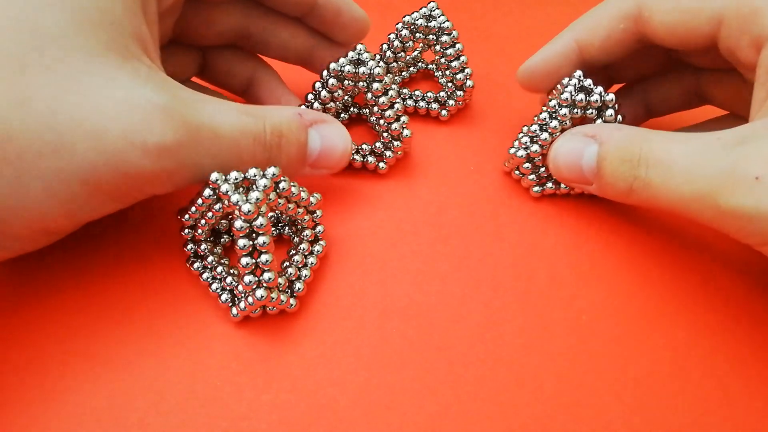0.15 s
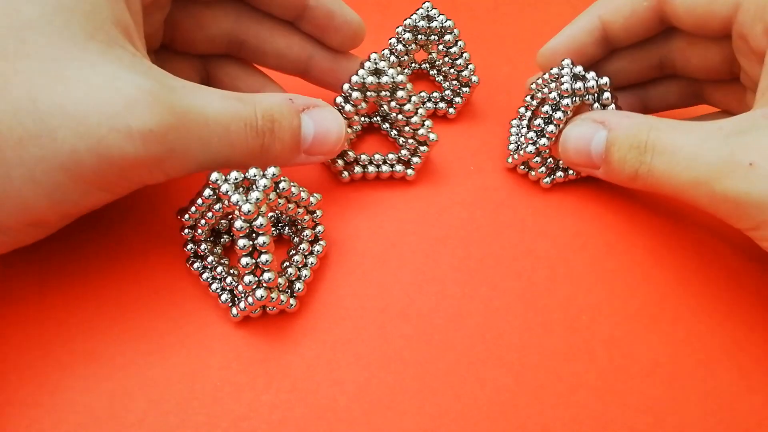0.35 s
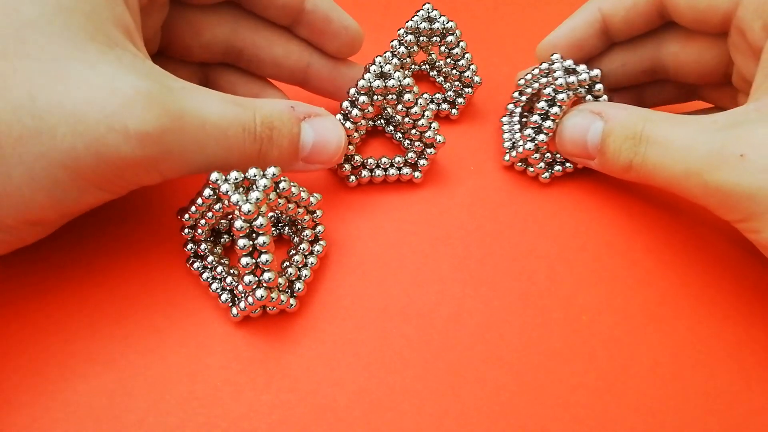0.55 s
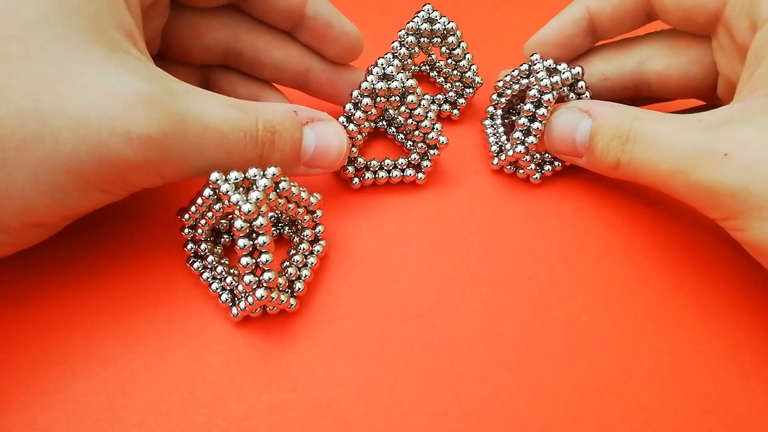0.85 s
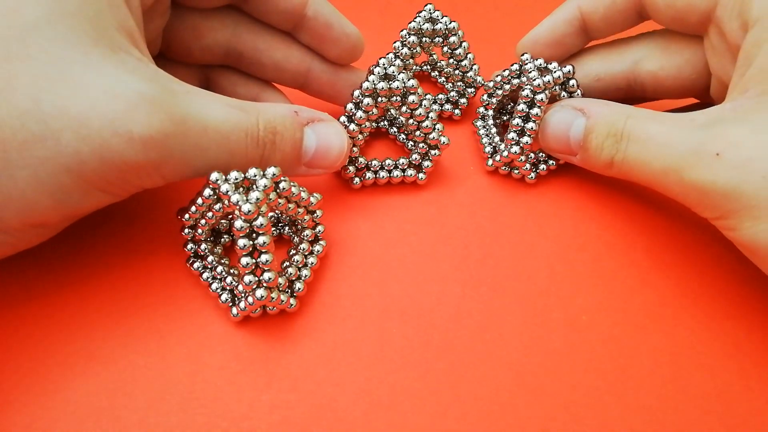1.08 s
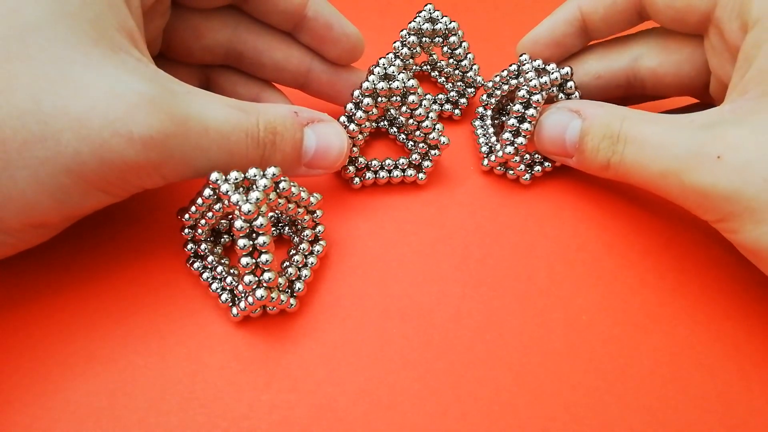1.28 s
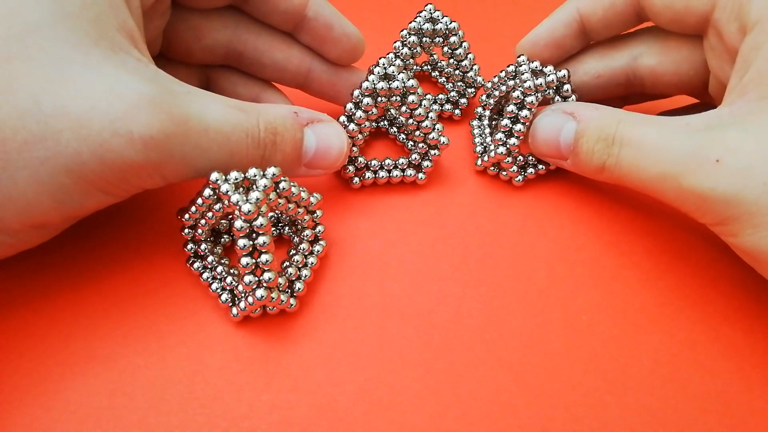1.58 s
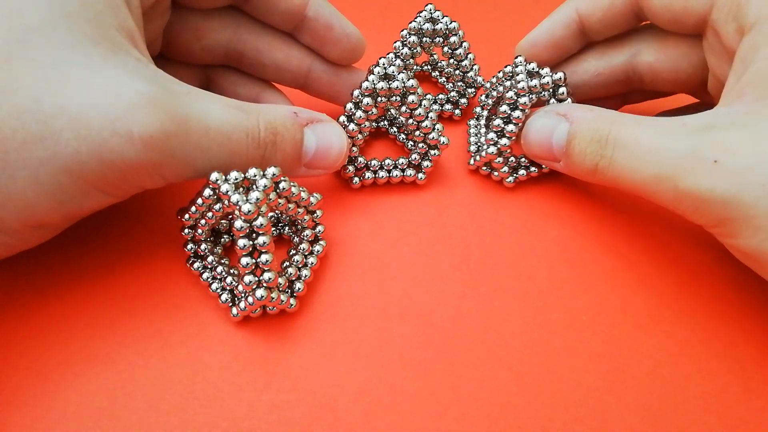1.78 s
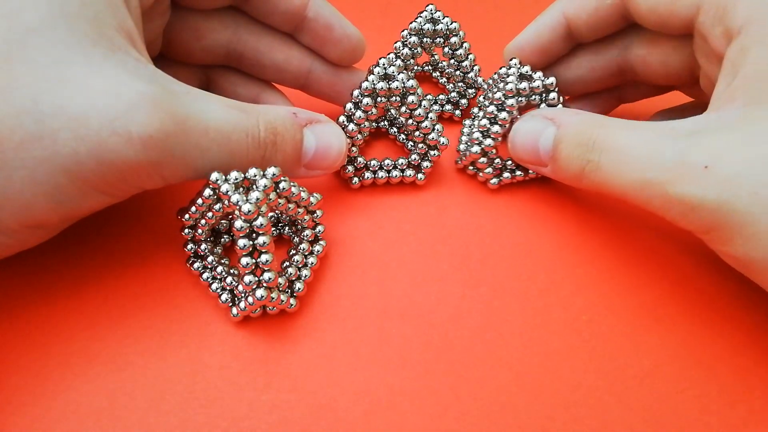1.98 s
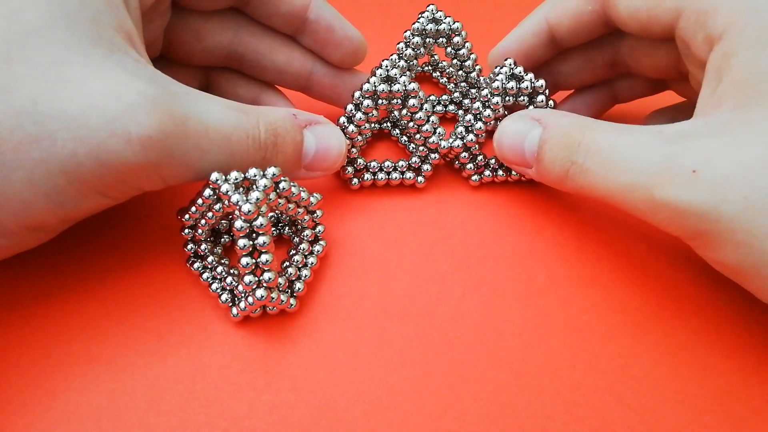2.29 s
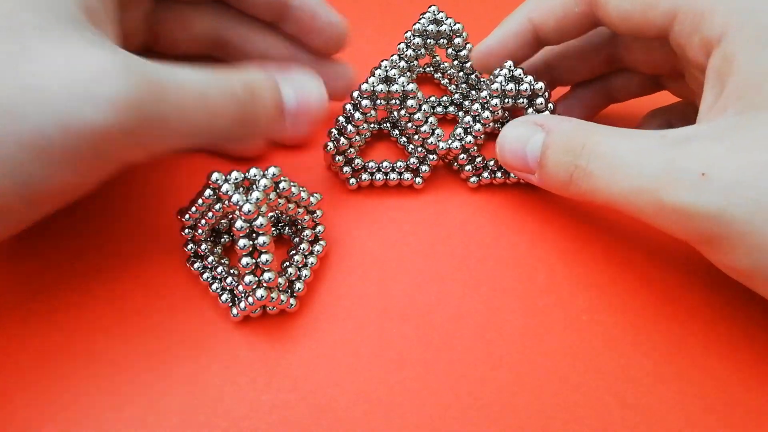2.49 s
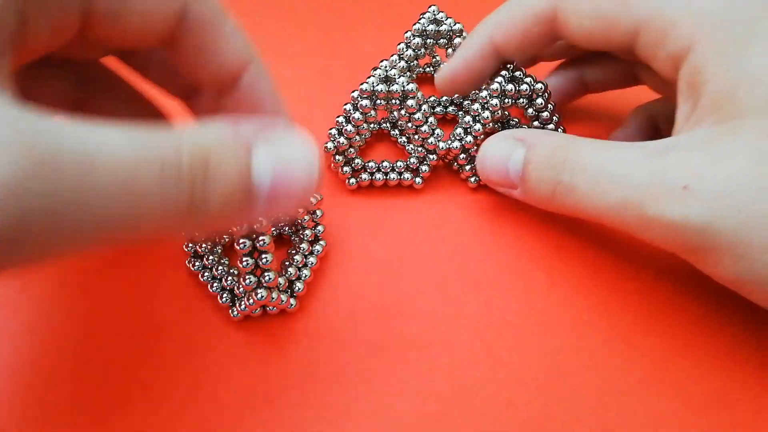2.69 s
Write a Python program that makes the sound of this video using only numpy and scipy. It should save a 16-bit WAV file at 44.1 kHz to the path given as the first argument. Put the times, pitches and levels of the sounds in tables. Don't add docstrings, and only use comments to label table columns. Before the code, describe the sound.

Small magnetic steel ball shapes click together sharply on a paper-covered table, with light finger rustle

```python
import sys
import numpy as np
from scipy import signal
from scipy.io import wavfile
from scipy.ndimage import uniform_filter1d

SR = 44100
rng = np.random.default_rng(int(sys.argv[2]) if len(sys.argv) > 2 else 0)


def decibels_to_gain(level_db):
    exponent = np.asarray(level_db, float) / 20
    return 10 ** exponent


def int16_out(signal):
    q = np.round(np.clip(np.atleast_2d(signal).T, -1, 1) * 32767)
    wavfile.write(sys.argv[1], SR, q.astype(np.int16))


N = 125685
T = np.arange(N) / SR
OPPOSITE = np.array([[1], [-1]])

# (frequency [Hz], level [dB], time to fall 60 dB [s])
TABLE_MODES = [(124, -6.5, 0.31), (172, -3, 0.062), (198.3, -1.5, 0.075), (252.5, 6, 0.042),
               (342.7, 0, 0.062), (396, -12.5, 0.082), (480, -12, 0.08), (646, -2.5, 0.067),
               (755, -26, 0.05), (895, -1.5, 0.057), (1137, -4, 0.048), (1300, -16, 0.032),
               (1604, -10, 0.1), (1950, -31, 0.1)]
# (frequency [Hz], lead [radians])
TABLE_PHASE = [(100, 0.067), (200, 0.46), (350, 1.07), (650, 0.43), (900, 2.03), (1200, -0.055),
               (2000, 0.078)]
# (frequency [Hz], left over right [dB])
TABLE_PAN = [(100, 0.5), (350, 0.5), (650, -5.5), (900, -10.5), (1200, -3), (2000, -12)]
# (time [s], level [dB])
DRAG_PATH = [(0, -58), (.03, -60), (.055, -60), (.09, -56.5), (.125, -65.5), (.24, -67), (.27, -61.5),
             (.3, -61.5), (.335, -55.5), (.37, -64.5), (.5, -76.5), (.63, -64.5), (.75, -71.5), (.95, -70),
             (1.05, -88.5), (2.82, -95.5), (2.842, -59)]
# (time [s], level [dB], centre [Hz])
CRINKLE = [(0, -88, 1376), (.016, -74, 1320), (.08, -70, 1410), (0.201, -73, 1271), (.235, -65.5, 1270),
           (.28, -83, 1510), (0.359, -70.5, 1683), (.43, -84, 1506), (.55, -80, 1624), (1, -94, 1400),
           (2.07, -93, 1100), (2.099, -64, 1280), (2.115, -91, 1274)]
# (time [s], level [dB], left over right [dB])
SLIDE_PATH = [(0, -62.5, 5.5), (.09, -64.5, 4), (.13, -75.5, 6), (.22, -65.5, 2), (.275, -59, 8),
              (.32, -59.5, 6), (.36, -73, 10.5), (1.901, -79, 3), (1.98, -73, 2), (2.1, -75.5, 3),
              (2.439, -76.5, 3), (2.508, -55, 8), (2.55, -57.5, 7.5), (2.607, -51, 9), (2.622, -70, 12),
              (2.69, -64, 14), (2.74, -56.5, 12), (2.85, -58, 12.5)]
# (frequency [Hz], level [dB])
SLIDE_COLOUR = [(1200, -25), (3500, -15.5), (6000, -16.5), (9000, -7.5), (11200, 0.5), (12600, -5),
                (14000, -19), (16000, -28)]
# (time [s], pitch [Hz], level [dB])
SQUEAK = [(.07, 10450, -90), (.09, 10500, -72), (.105, 10500, -84), (.135, 10450, -71), (.16, 10100, -73),
          (.19, 9700, -78), (.21, 9700, -90)]
# start, full, still full, end (time [s])
CHATTER_S = (2.55, 2.585, 2.612, 2.62)
# (frequency [Hz], level [dB])
FLOOR_COLOUR = [(15, -36), (25, -1.5), (66, -3.5), (174, -10.5), (371, -13), (449, -16), (1470, -17),
                (11400, -24.5), (15800, -40)]
# (frequency [Hz], correlation [-1 to 1])
FLOOR_LIKENESS = [(60, 1), (130, 0.8), (290, -0.098), (640, -0.68), (1410, 0.17), (3100, 0.032),
                  (6820, 0.02), (15000, -1.22)]
SNAP_S = [.2266, .2318, .2330, .2461, .2479, .2503, .2662, .2702, .2743, .2775, .2826, .2881, .3048, .3170,
          .3382, .3423, .353, .4488, 1.0693, 1.0696, 1.0802, 1.37, 2.1928, 2.1954, 2.1988, 2.1994, 2.2000,
          2.2011, 2.2032]
# (peak [dB], centre [Hz], burst decay [ms])
SNAPS = [(-27.5, 13000, 1.0), (-28.5, 14600, 1.0), (-36, 13000, 1.5), (-35.5, 6200, 1.8), (-31, 13200, 1.6),
         (-45, 7200, 1.3), (-45, 16000, 1.8), (-33, 10500, 1.4), (-36.5, 11000, 1.7), (-46, 9800, 1.5),
         (-45, 11500, 1.5), (-33, 9400, 1.2), (-48, 12000, 3), (-48, 11000, 1), (-42, 8200, 1.6),
         (-49, 8200, 1.3), (-53, 7600, 1.4), (-23, 10600, 0.74), (-25.5, 10400, 0.5), (-26.5, 13000, 0.9),
         (-47, 12000, 1.2), (-60, 11000, 1.5), (-21.5, 9900, 0.8), (-40, 11000, 1.5), (-12.5, 11900, 0.51),
         (-15.5, 12000, 0.78), (-14.5, 11000, 0.65), (-23, 14700, 1.3), (-24, 9600, 1.7)]
# (time [s], level [dB], push length [ms], brightness [dB per octave], direction [sign])
KNOCKS = [
    (.449, -62.5, 4.4, -14, 1),
    (1.0692, -38, 0.63, -3.5, -1),
    (2.194, -43, 0.16, -6, 1),
    (2.1998, -34, 0.77, 2.5, 1),
]
KNOCK_LEAN_DB = [0, -8, 1, 0.5]
CRACK_S = [1.0692, 2.1927, 2.1988]
CRACK_DB = [-40, -32.5, -27]
# (frequency [Hz], level [dB], time to fall 60 dB [s])
CRACK_MODES = [
    [(1345, -9, 0.036), (1570, -10, 0.025), (1240, -13, 0.052), (2750, -2, 0.011), (3220, -2.5, 0.011),
     (3730, 4.5, 0.0055)],
    [(3710, 9.5, 0.0066), (1870, -2.5, 0.012), (3330, -4.5, 0.0087), (5000, -11, 0.0087),
     (7100, -15, 0.012), (1100, -2, 0.015)],
    [(3760, 1, 0.011), (4090, 0, 0.0063), (5227, 4, 0.0092), (1562, -13, 0.032), (7020, -2, 0.011),
     (3350, -4, 0.009)],
]
SPLASH_DB = [-3.5, -5, -5.5]
SPLASH_HZ = [2560, 3940, 4200]
# (frequency [Hz], level [dB], time to fall 60 dB [s])
ROOM_BANDS = [(322, -28.5, 0.18), (1300, -25.5, 0.18), (2420, -35, .17), (4630, -42, 0.14),
              (6160, -39, 0.28), (11600, -38.5, 0.21)]


def unit(x):
    return x / np.sqrt(np.mean(x ** 2))


def read(table, hz):
    a = np.array(table, float)
    return np.interp(np.log(hz), np.log(a[:, 0]), a[:, 1])


def band(x, hz, width):
    return signal.lfilter(*signal.iirpeak(min(hz, .45 * SR), hz / width, fs=SR), x)


def steep_band(x, hz, width):
    return band(band(x, hz, width), hz, width)


def walk(rate):
    k = int(SR / rate)
    steps = np.repeat(rng.standard_normal(N // k + 1), k)
    return unit(uniform_filter1d(uniform_filter1d(steps, k), k)[:N])


def pair(likeness, size):
    c = np.clip(likeness, -.99, .99)
    shared, differing = rng.standard_normal((2, size))
    return np.sqrt((1 + c) / 2) * shared + np.sqrt((1 - c) / 2) * differing * OPPOSITE


def pan(db):
    return decibels_to_gain(np.array([db / 2, -db / 2]).reshape(2, -1))


def add(out, s, x):
    i = int(s * SR)
    out[:, i:i + x.shape[1]] += x[:, :N - i]


def ring_table(force, tilt_db, lean_db=0):
    out = 0
    for hz, db, t60 in TABLE_MODES:
        pole = np.exp(2j * np.pi * hz / SR - np.log(1000) / (t60 * SR))
        ringing = signal.lfilter([1], [1, -pole], force)
        turn = np.exp(.5j * read(TABLE_PHASE, hz) * OPPOSITE)
        octaves = np.log2(hz / 200)
        shade_db = lean_db * np.clip(octaves, 0, 1.6)
        level = decibels_to_gain(db + tilt_db * octaves - abs(shade_db) / 2)
        out = out + level * pan(read(TABLE_PAN, hz) + shade_db) * (ringing * turn).imag
    return signal.sosfilt(signal.butter(4, 110, "high", fs=SR, output="sos"), out)


def crinkle_paper():
    s, db, hz = np.array(CRINKLE, float).T
    low_pass = signal.butter(2, 360 / 2, fs=SR, output="sos")
    slow = signal.sosfilt(low_pass, pair(0.67, size=N) + 1j * pair(0.67, size=N))
    carrier = np.exp(2j * np.pi * np.cumsum(np.interp(T, s, hz)) / SR)
    return unit((slow * carrier).real) * decibels_to_gain(np.interp(T, s, db) + 2.9 * walk(25))


def drag_shapes():
    judder_db, tilt_db, hum_hz, hum_width_hz, hum_db = 1, -3, 196, 97, -3
    rub = rng.standard_normal(N) * decibels_to_gain(judder_db * walk(29.1))
    hum = steep_band(rub, hum_hz, hum_width_hz)
    scrape = unit(ring_table(rub, tilt_db)) + decibels_to_gain(hum_db) * unit(hum)
    return scrape * decibels_to_gain(np.interp(T, *np.array(DRAG_PATH).T) - 4.0)


def chatter():
    slips_per_s, most = 195, .45
    depth = most * np.interp(T, CHATTER_S, [0, 1, 1, 0])
    slip = np.cumsum(slips_per_s * (1 + .08 * walk(60))) / SR % 1
    return 1 - depth + 2.6 * depth * np.exp(-slip / .2)


def squeak():
    s, hz, db = np.array(SQUEAK, float).T
    pitch = np.interp(T, s, hz) * (1 + .003 * walk(150))
    tone = np.sin(2 * np.pi * np.cumsum(pitch) / SR)
    return tone * decibels_to_gain(np.interp(T, s, db, -200, -200))


def slide_fingers():
    grain_db, flicker_db, press_hz, press_db_per_db = 2, 1, 14500, 1.1
    s, level_db, side_db = np.array(SLIDE_PATH, float).T
    db = np.interp(T, s, level_db)
    grain = decibels_to_gain(-grain_db * np.log(rng.random(N) + 1e-9))
    hiss = 0
    for hz in 1200 * 2 ** np.arange(0, 3.8, .25):
        strength = decibels_to_gain(read(SLIDE_COLOUR, hz) + flicker_db * walk(39.67))
        hiss = hiss + strength * steep_band(pair(0.16, size=N) * grain, hz, hz / 5)
    top = unit(band(pair(.1, size=N) * grain, press_hz, 3000))
    top = top * decibels_to_gain(press_db_per_db * (db + 53) - 9)
    return (unit(hiss) + top) * chatter() * decibels_to_gain(db) * pan(np.interp(T, s, side_db)) + squeak()


def floor():
    level_db, air_hz, air_db = -66.5, 15200, -14.5
    out = 0
    for hz in 25 * 2 ** np.arange(0, 9.5, 1 / 3):
        noise = pair(read(FLOOR_LIKENESS, hz), size=N)
        out = out + decibels_to_gain(read(FLOOR_COLOUR, hz)) * steep_band(noise, hz, hz / 3)
    air = decibels_to_gain(air_db) * unit(steep_band(pair(0, size=N), air_hz, 3500))
    return (out / np.sqrt(np.mean(out.mean(axis=0) ** 2)) + air) * decibels_to_gain(level_db)


def snaps():
    ticks_per_s, scatter_db, likeness = 24000, -2, 0.069
    relative_width, broad_db, lead_db, pan_db = 0.38, -45, 7, 1
    after_db, after_ms, after_hz = -15, 2.25, 10660
    out, t = np.zeros((2, N)), T[:1024]
    for s, (db, hz, ms) in zip(SNAP_S, SNAPS):
        chance, size = rng.random((2, 1024))
        ticks = (chance < ticks_per_s / SR) * decibels_to_gain(-scatter_db * np.log(size + 1e-9))
        x = pair(likeness, size=1024) * ticks * np.exp(-t * 1000 / max(ms, .2))
        x[0, 0] = x[1, 1] = decibels_to_gain(lead_db)
        rattle = steep_band(x, hz, relative_width * hz) + decibels_to_gain(broad_db) * np.diff(x, prepend=0)
        rattle = rattle / abs(rattle).max(axis=1, keepdims=True)
        after = unit(band(pair(0, size=1024) * ticks, after_hz, 2700))
        after = after * decibels_to_gain(after_db) * np.exp(-t * 1000 / after_ms)
        add(out, s, (rattle + after) * decibels_to_gain(db) * pan(pan_db))
    return out


def knocks():
    out, t = np.zeros((2, N)), T[:16384]
    for (s, db, ms, tilt_db, way), lean_db in zip(KNOCKS, KNOCK_LEAN_DB):
        push = np.sin(np.pi * np.clip(t * 1000 / ms, 0, 1)) ** 2
        add(out, s, np.sign(way) * decibels_to_gain(db) * ring_table(push / push.sum(), tilt_db, lean_db))
    return out


def cracks():
    rise_ms, port_spread, splash_width_hz, splash_t60 = 0.13, 1, 2800, 0.03
    out, t = np.zeros((2, N)), T[:16384]
    for s, db, splash_db, modes, splash_hz in zip(CRACK_S, CRACK_DB, SPLASH_DB, CRACK_MODES, SPLASH_HZ):
        crack = 0
        for hz, mode_db, t60 in modes:
            phase = rng.random() * 2 * np.pi + port_spread * (rng.random() - .5) * OPPOSITE
            crack = crack + decibels_to_gain(mode_db - 60 * t / t60) * np.sin(2 * np.pi * hz * t + phase)
        splash = unit(band(pair(0.099, size=len(t)), splash_hz, splash_width_hz))
        crack = crack + decibels_to_gain(splash_db - 60 * t / splash_t60) * splash
        add(out, s, decibels_to_gain(db) * crack * (1 - np.exp(-t * 1000 / rise_ms)))
    return out


def room(x):
    alike_hz, relative_width, gap_s = 350, 0.79, 0.0025
    t, tail = T[:12000], 0
    for hz, db, t60 in ROOM_BANDS:
        noise = pair(min((alike_hz / hz) ** 2, .9), size=len(t))
        tail = tail + decibels_to_gain(db) * steep_band(noise, hz, hz * relative_width) * decibels_to_gain(-60 * t / t60)
    return signal.fftconvolve(x, tail * (1 - np.exp(-t / gap_s)), axes=1)[:, :N]


def scene():
    soft = drag_shapes() + crinkle_paper() + slide_fingers() + floor()
    hits = snaps() + knocks() + cracks()
    hiss_top = signal.ellip(8, .1, 50, 15750, fs=SR, output="sos")
    return hits + signal.sosfiltfilt(hiss_top, soft + room(hits))


def roll_off(x):
    return signal.sosfilt(signal.butter(12, 17090, fs=SR, output="sos"), x)


def record(dry):
    finished = signal.sosfiltfilt(signal.ellip(8, .1, 60, 16700, fs=SR, output="sos"), dry)
    return roll_off(finished)


dry = scene()
out = record(dry)
int16_out(out)
```